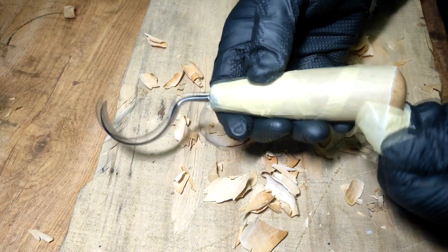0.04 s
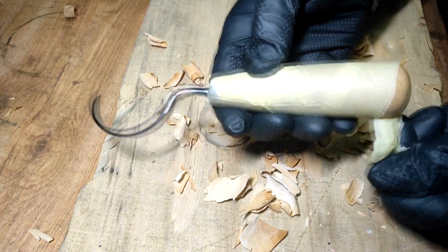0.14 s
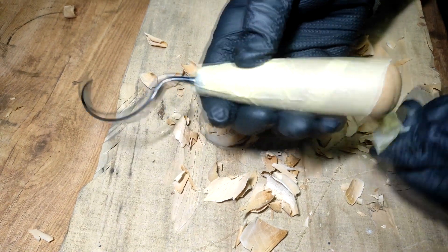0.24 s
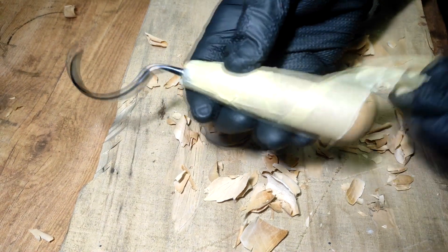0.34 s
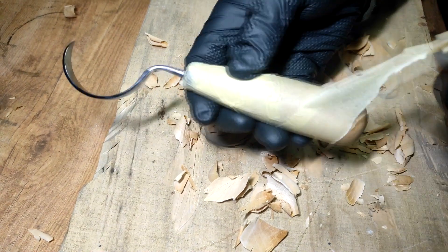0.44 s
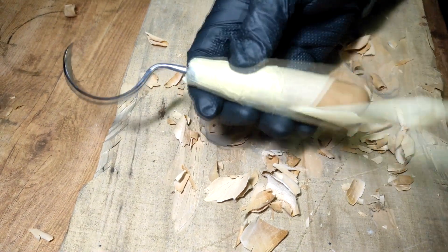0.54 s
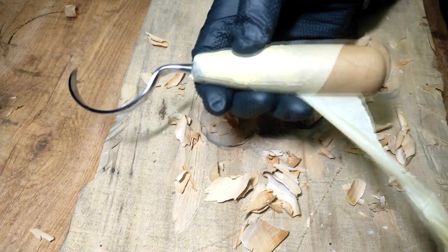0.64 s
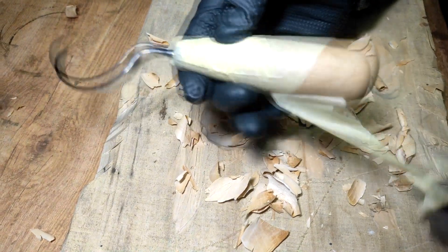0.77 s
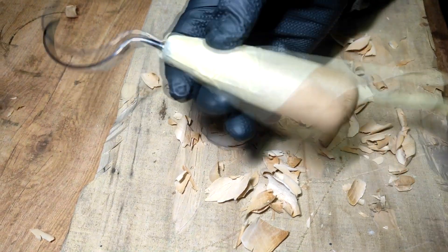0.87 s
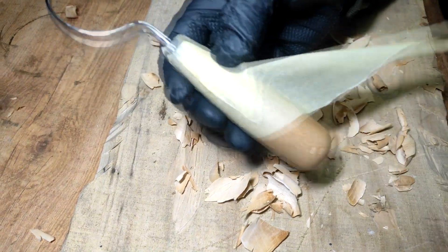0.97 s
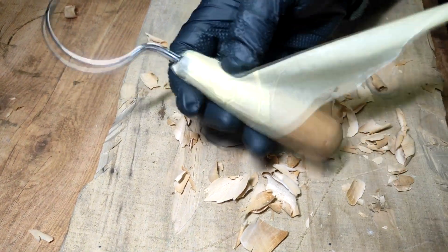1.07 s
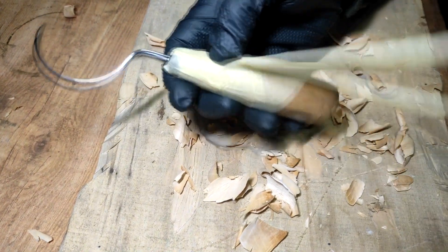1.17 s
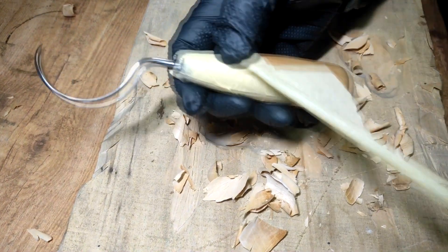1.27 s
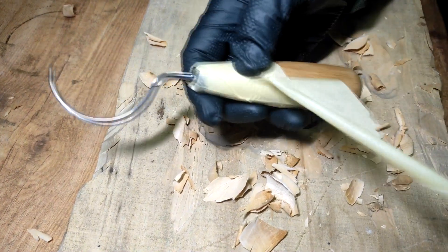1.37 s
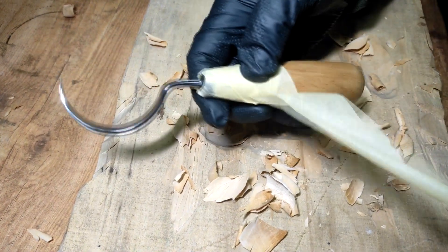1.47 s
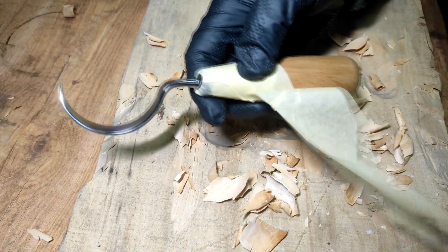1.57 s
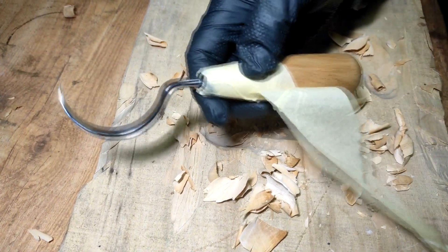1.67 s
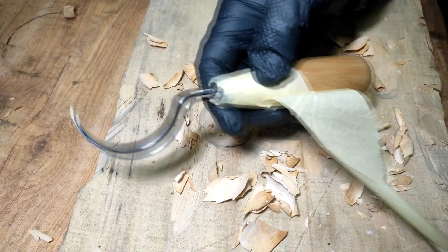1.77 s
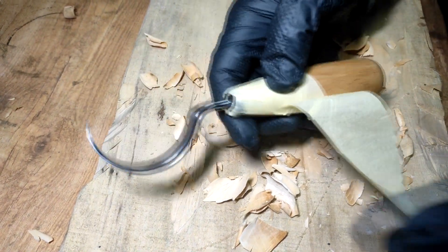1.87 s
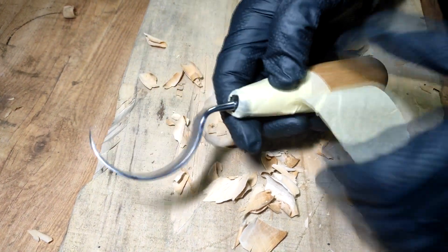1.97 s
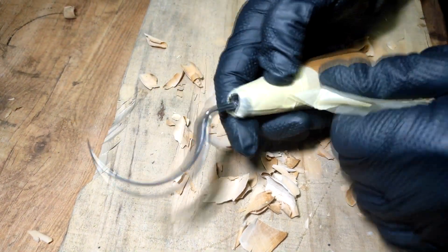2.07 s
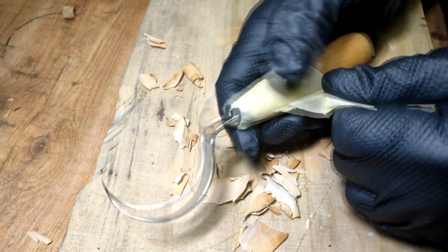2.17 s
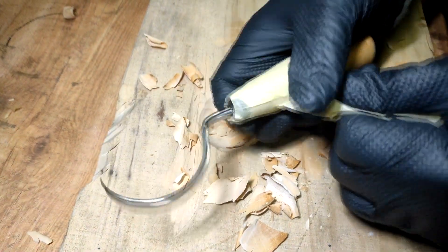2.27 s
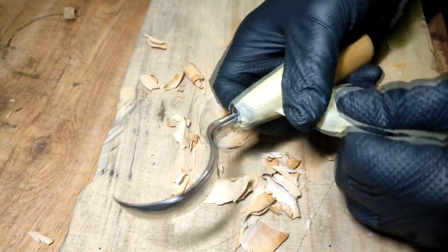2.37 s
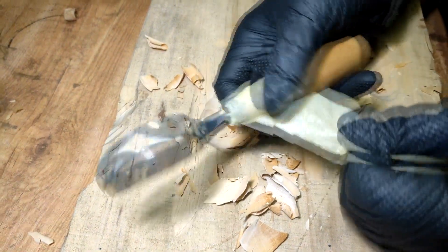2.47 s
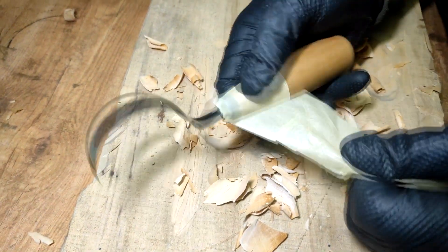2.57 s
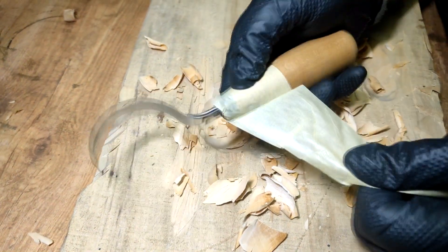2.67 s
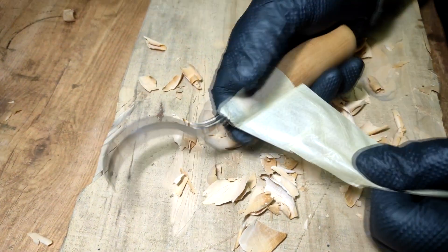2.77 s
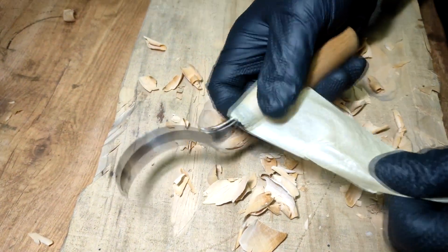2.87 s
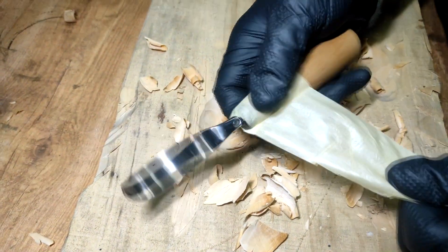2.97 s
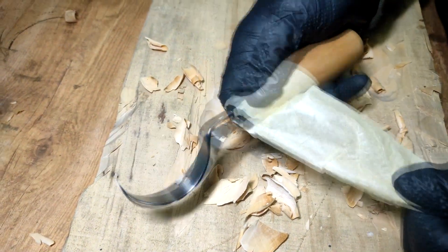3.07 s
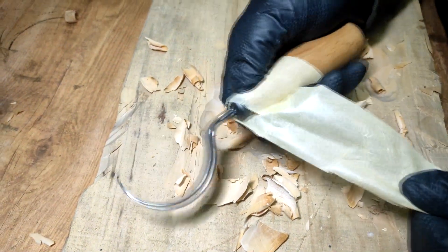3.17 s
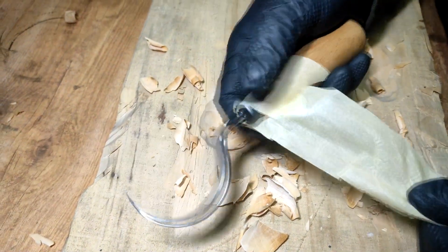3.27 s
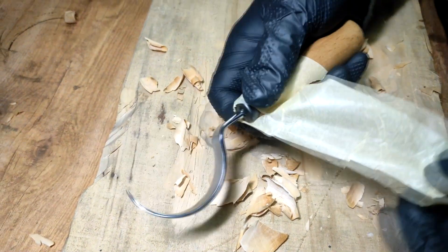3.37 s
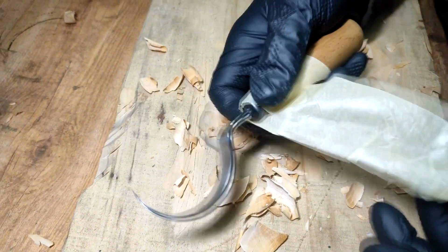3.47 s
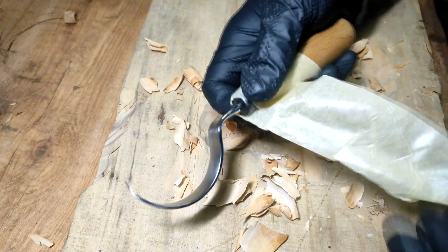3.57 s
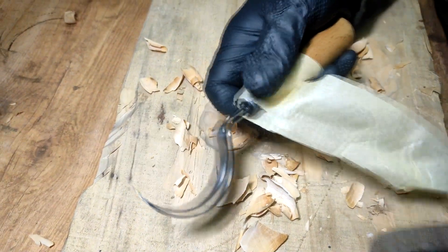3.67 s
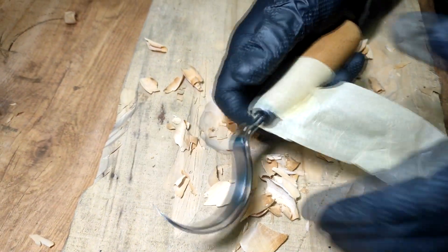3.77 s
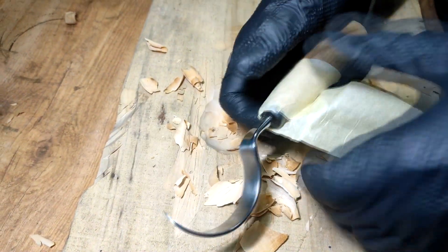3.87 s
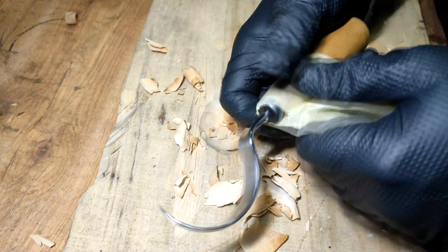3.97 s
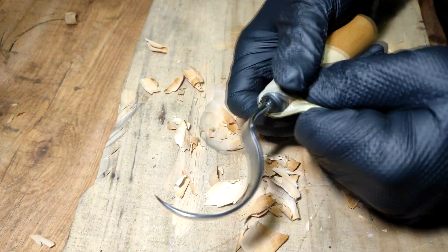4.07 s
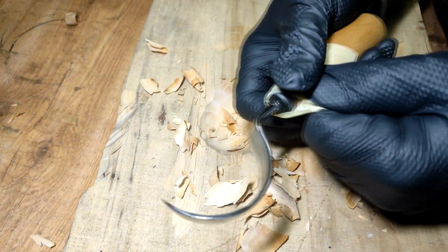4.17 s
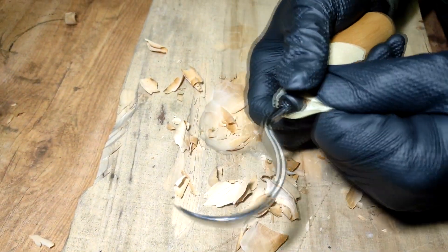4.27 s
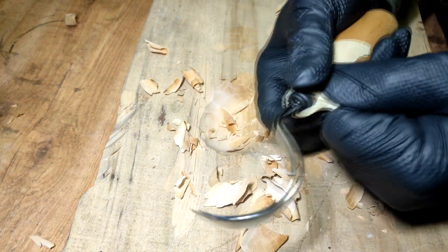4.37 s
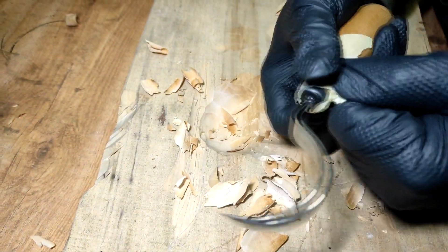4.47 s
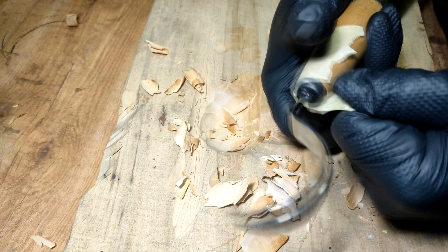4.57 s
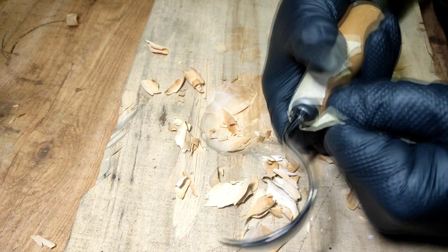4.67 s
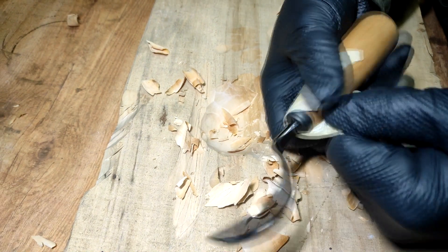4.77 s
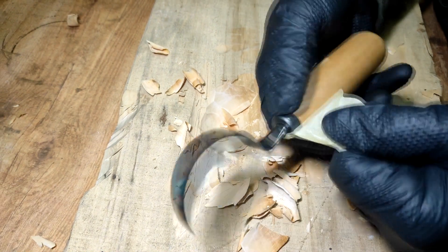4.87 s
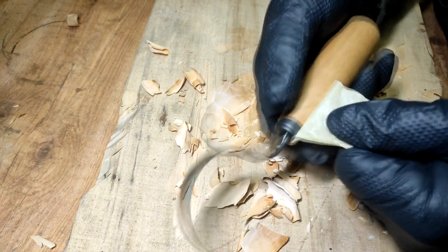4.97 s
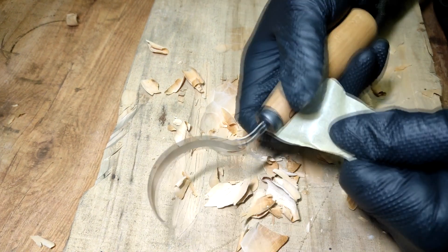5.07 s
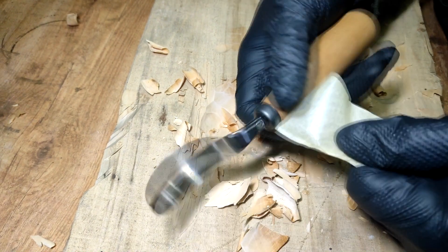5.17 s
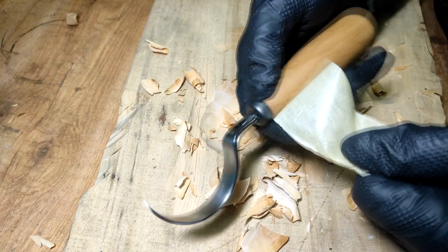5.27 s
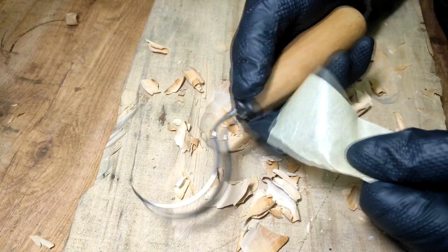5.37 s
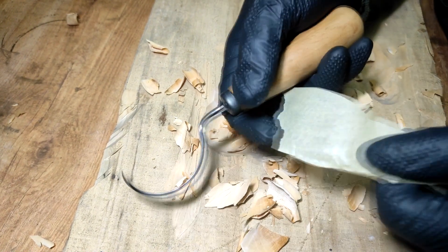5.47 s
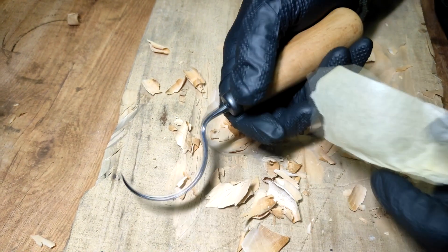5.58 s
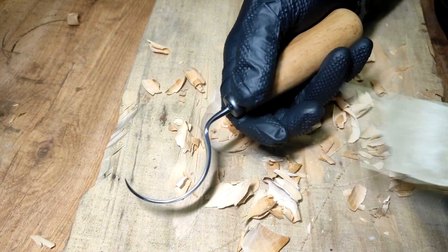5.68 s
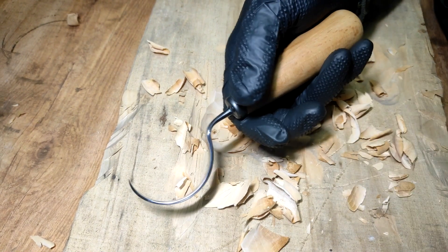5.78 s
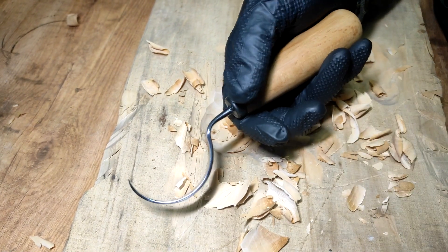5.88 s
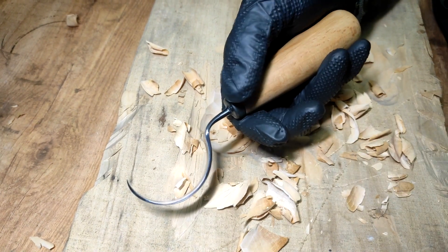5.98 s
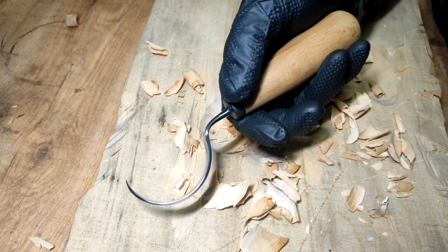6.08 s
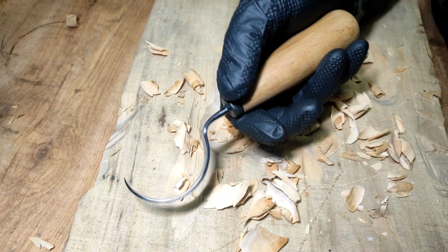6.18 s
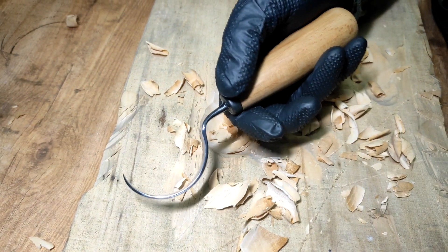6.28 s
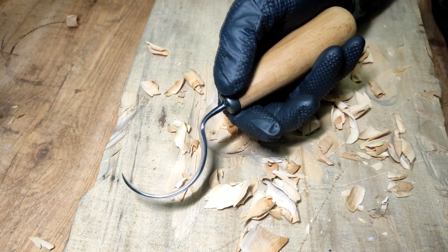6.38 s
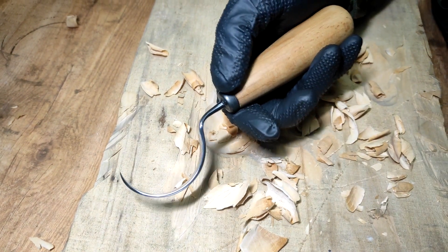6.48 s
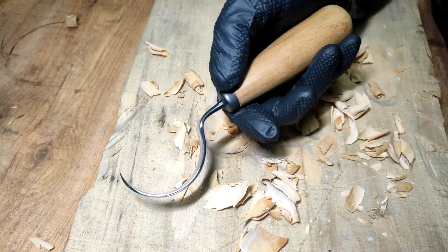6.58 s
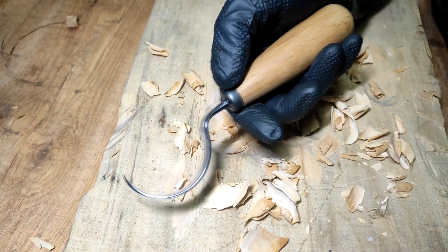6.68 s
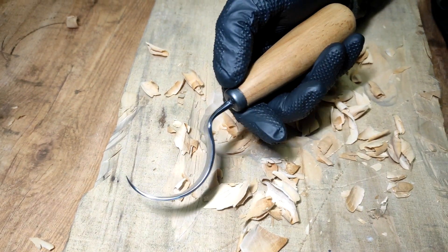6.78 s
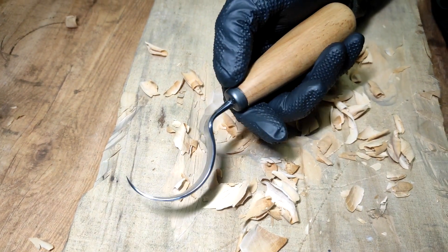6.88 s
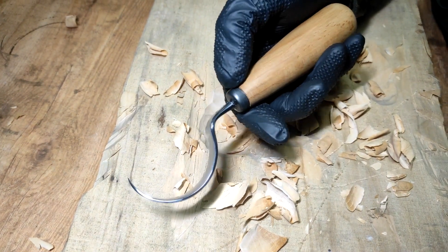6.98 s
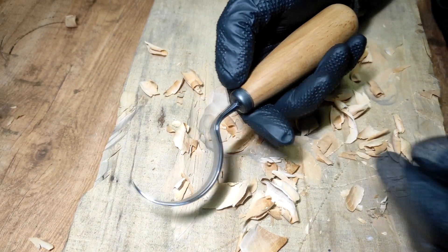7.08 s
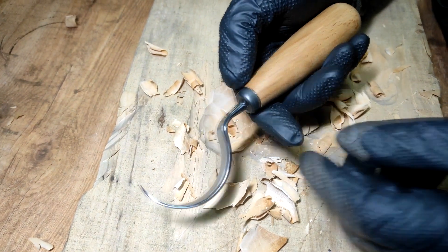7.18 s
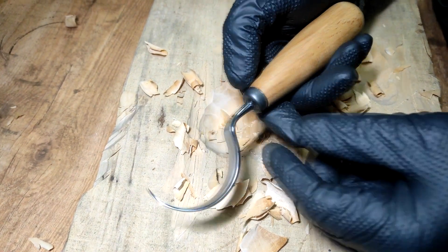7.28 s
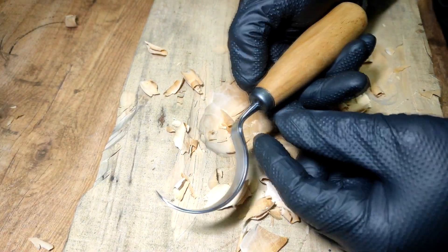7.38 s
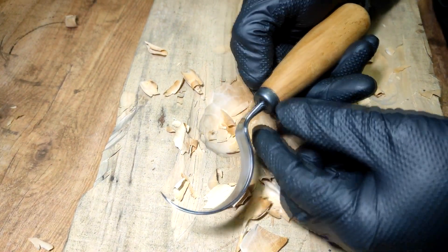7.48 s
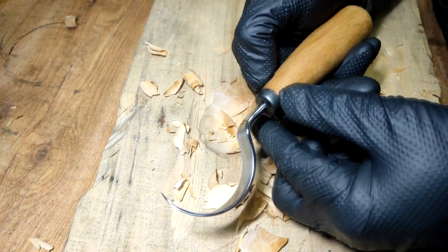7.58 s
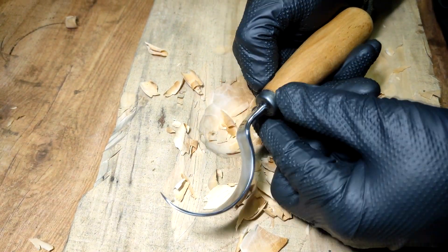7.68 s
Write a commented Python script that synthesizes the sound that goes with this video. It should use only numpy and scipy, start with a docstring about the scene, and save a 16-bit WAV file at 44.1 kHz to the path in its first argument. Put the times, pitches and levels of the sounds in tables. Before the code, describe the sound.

Close, crisp crackling and tearing as gloved hands pull adhesive wrap from a handle in uneven bursts, ending in faint rubbing.

```python
"""Peeling sticky wrap off a tool handle

Gloved hands pull wrap from a wooden handle, close to a phone above a workbench. The glue lets go by
stick-slip, in dense irregular clicks, and the creased sheet snaps in lone cracks with a short rattle.
The bench and a small quiet workshop reflect the sound; the phone's ports resonate near 7 kHz."""
import sys
import numpy as np
from scipy import signal
from scipy.fft import rfft, irfft
from scipy.io import wavfile
from scipy.ndimage import uniform_filter1d

SR = 44100
rng = np.random.default_rng(int(sys.argv[2]) if len(sys.argv) > 2 else 0)


def output_pcm(signal):
    """Save a mono or channel-first signal as 16-bit PCM at the path in sys.argv[1].

    Samples are clipped to [-1, 1] before scaling.
    """
    pcm = np.clip(np.atleast_2d(signal).T, -1, 1) * 32767
    wavfile.write(sys.argv[1], SR, np.round(pcm).astype(np.int16))


N = 341334

# Position of the hands. Each row: time in seconds, left minus right level in dB.
HANDS = [(0.0, -3), (0.19, -0.5), (2.87, -3), (3.75, 0.5), (4.18, -4), (6.1, -1), (6.81, -3.5), (7.26, 26),
         (7.52, -5.5), (7.74, -7)]
# Band edges of what a slip excites: the handle thuds, the sheet flexes, the glue ticks.
HANDLE_HZ = [300, 600, 850, 1100, 1400]
SHEET_HZ = [1400, 2100, 3100, 4500]
TICK_HZ = [4500, 6200, 8200, 11000, 17000]
LEFT_RIGHT = np.array([[1], [-1]])


def undb(db):
    """Amplitude ratio of a level in dB."""
    return 10 ** (np.asarray(db) / 20)


def unit(x):
    """Normalisation to an RMS of 1."""
    return x / np.sqrt(np.mean(x ** 2))


def butter(x, order, hz, kind):
    """Butterworth filtering, flat in the passband."""
    return signal.sosfilt(signal.butter(order, hz, kind, fs=SR, output="sos"), x)


def at(curve, t):
    """Linear interpolation of a curve at times t."""
    return np.interp(t, *np.transpose(curve))


def delayed(x, lag):
    """A moving delay of lag samples, by interpolation."""
    return np.interp(np.arange(N) - lag, np.arange(N), x)


def gain_at(spectrum, size):
    """Gain in dB at each transform bin, interpolated over log frequency."""
    hz, db = np.transpose(spectrum)
    return np.interp(np.log(np.maximum(np.fft.rfftfreq(size, 1 / SR), 1)), np.log(hz), db)


def minimum_phase(db):
    """Folding the cepstrum gives the most compact causal response with these gains."""
    cepstrum = irfft(db * np.log(10) / 20)
    cepstrum[1:len(cepstrum) // 2] *= 2
    cepstrum[len(cepstrum) // 2 + 1:] = 0
    return irfft(np.exp(rfft(cepstrum)))


def sway(rate):
    """Slow random modulation of RMS 1, ramping to a new value rate times a second."""
    hold = int(SR / rate)
    steps = np.repeat(rng.standard_normal(N // hold + 1), hold)
    return unit(uniform_filter1d(steps, hold)[:N])


def swells(events, rest_db, depth_db=17):
    """Powers add: a resting level plus events that change by depth_db over each rise and fall."""
    s, level_db, rise, fall = np.array(events).T[:, :, None]
    t = np.arange(0, N + 64, 64) / SR
    lost_db = depth_db * np.maximum((s - t) / rise, (t - s) / fall)
    power = undb(2 * rest_db) + undb(2 * (level_db - lost_db)).sum(0)
    return np.interp(np.arange(N) / SR, t, np.sqrt(power))


def workshop(air_db=-69):
    """Room noise, coherent between the ports mainly in the bass, over a deep rumble."""
    # Workshop air. Each row: frequency in Hz, relative spectral density in dB.
    air_spectrum = [(41, -23), (70, -5.5), (139, -11), (309, -15.5), (1570, -22), (5030, -19),
                    (7080, -15.5), (9110, -23), (10400, -63.5), (16500, -49)]
    # Rumble as the hands move. Each row: peak time in seconds, level in dB, rise and fall in seconds.
    rumbles = [(2.05, -62.5, 0.12, 0.18), (3.575, -68, 0.032, 0.16), (4.65, -54.5, 0.033, 0.11),
               (4.95, -66.5, 0.13, 0.11), (5.7, -67, 0.092, .1), (5.99, -67, 0.37, 0.26),
               (7.15, -69, 0.33, 0.29)]
    mid, side = rfft(rng.standard_normal((2, N))) * undb(gain_at(air_spectrum, N))
    width = np.clip(np.fft.rfftfreq(N, 1 / SR) / 700, .45, 1)
    air = irfft(mid + LEFT_RIGHT * width * side, N)
    low = butter(rng.standard_normal((2, N)), 3, [22, 68], "bandpass")
    rumble = unit(low[0]) * undb(3 * LEFT_RIGHT) + .39 * unit(low[1]) * LEFT_RIGHT
    return unit(air) * undb(air_db) + rumble * swells(rumbles, rest_db=-77.5)


def echo(t60, level_db, delay_s, top_hz):
    """Diffuse reflections decay exponentially, in a separate pattern at each port."""
    t = np.arange(int(t60 * SR)) / SR
    spray = rng.standard_normal((2, len(t))) * undb(-60 * t / t60) * (t > delay_s)
    spray = butter(spray, 1, top_hz, "lowpass")
    return spray * undb(level_db) / np.sqrt(np.sum(spray ** 2, 1, keepdims=True))


def reflections(x, patterns=6):
    """Early reflections off hands, tool and sheet, later ones off walls; patterns blend as hands move."""
    shares = undb(15 * np.array([sway(6) for _ in range(patterns)]))
    shares /= np.sqrt(np.sum(shares ** 2, 0))
    out = np.zeros((2, N))
    for share in shares:
        near = echo(t60=.007, level_db=-7, delay_s=.0006, top_hz=9200)
        walls = echo(t60=.25, level_db=-16, delay_s=.0046, top_hz=7000)
        for response in near, walls:
            out += signal.oaconvolve(x * share, response, axes=1)[:, :N]
    return out


def bench_top(x, share=.46, delay_s=.00042, drift_s=.000222):
    """Comb filtering: the image source in the bench arrives late, by a gap that drifts with the hands."""
    lags = np.abs(delay_s + drift_s * (sway(5) + .48 * sway(5) * LEFT_RIGHT)) * SR
    return x + share * np.array([delayed(channel, lag) for channel, lag in zip(x, lags)])


def grip():
    """Contact noise of rubber on wood: dull uneven bumps, louder at the left port."""
    # Shifts of grip. Each row: peak time in seconds, level in dB, rise and fall in seconds.
    shifts = [(0.3, -51.5, 0.06, 0.041), (0.445, -58, 0.025, 0.11), (0.51, -49, 0.072, 0.13),
              (0.59, -52, 0.061, 0.18), (0.95, -56.5, 0.18, 0.48), (1.55, -65, 0.044, 0.28),
              (2.15, -63, 0.21, 0.16), (2.285, -63.5, 0.011, 0.065), (2.64, -49, 0.12, 0.14),
              (3.12, -57.5, 0.33, 0.2), (3.46, -52.5, 0.034, 0.039), (3.572, -48, 0.022, 0.036),
              (4.642, -46.5, 0.011, 0.051), (5.12, -60.5, 0.038, 0.12), (5.325, -60.5, 0.013, 0.17),
              (5.65, -45, 0.035, 0.065), (5.85, -61.5, 0.017, 0.11), (6.1, -62.5, 0.25, 0.12)]
    bumps = rng.standard_normal((2, N)) * undb(3.3 * sway(40))
    dull = butter(bumps, 3, [150, 540], "bandpass")
    stereo = unit(dull[0]) * undb(2.5 * LEFT_RIGHT) + .5 * unit(dull[1]) * LEFT_RIGHT
    return stereo * swells(shifts, rest_db=-74)


def band_responses(edges_hz, size=2048):
    """Impulse responses of each band at both ports; their sum, averaged over the ports, has energy 1."""
    # The wrap heard through the ports. Each row: frequency in Hz, relative spectral density in dB.
    colour = [(240, -51), (400, -29), (650, -17.5), (1200, -14), (1870, -17.5), (3030, -15.5), (5730, -13),
              (6500, -5), (7600, -4), (8700, -11.5), (10200, -24), (15000, -26), (16500, -43)]
    # Imbalance of the ports. Each row: frequency in Hz, left minus right level in dB.
    imbalance = [(60, -8), (110, -4.5), (200, 27), (380, 14.5), (700, 4), (1290, 5), (2380, 3), (4400, 1),
                 (8120, -2), (15000, 4)]
    ports = [minimum_phase(gain_at(colour, size) + side * gain_at(imbalance, size) / 2)
             for side in (1, -1)]
    bands = np.array([butter(ports, 2, pair, "bandpass") for pair in zip(edges_hz, edges_hz[1:])])
    return bands / np.sqrt(np.sum(bands.sum(0).mean(0) ** 2))


def clicks(s, parts, scatter_db, swell_db, smear_s):
    """Impulse excitation: a click at each time s rings every band with its own strength and delay."""
    out, pan_db = np.zeros((2, N)), at(HANDS, s)
    port_gap_s = .00005 * rng.standard_normal(len(s))
    for edges_hz, size in parts:
        for response in band_responses(edges_hz):
            strength, late, sign = rng.standard_normal((len(s), 3)).T
            # the stretched sheet changes shape, so each band swells and fades on its own
            shape_db = swell_db * sway(9)[np.clip((s * SR).astype(int), 0, N - 1)]
            push = size * undb(scatter_db * strength + shape_db) * np.sign(sign)
            for channel, side in enumerate((1, -1)):
                arrival = ((s + smear_s * np.abs(late) + side * port_gap_s / 2) * SR).astype(int)
                train = np.bincount(np.clip(arrival, 0, N - 1), push * undb(side * pan_db / 2), N)
                out[channel] += signal.oaconvolve(train, response[channel])[:N]
    return out


def pops(s, size, hz, t60):
    """Damped resonance: a pocket of sheet rings briefly at its own pitch."""
    t = np.arange(1024) / SR
    ring = (1 - np.exp(-t / .000088)) * undb(-60 * t / t60) * np.sin(2 * np.pi * hz[:, None] * t)
    where = np.clip((s * SR).astype(int)[:, None] + np.arange(len(t)), 0, N - 1).ravel()
    pan_db = .21 * at(HANDS, s)
    gains = size * undb(LEFT_RIGHT * pan_db / 2)
    return np.array([np.bincount(where, (gain[:, None] * ring).ravel(), N) for gain in gains])


def flaps():
    """A low damped resonance sounds as the strip lets go of the handle."""
    # Dull flaps. Each row: start in seconds, level in dB, pitch in Hz.
    releases = [(3.4569, -45, 499.4), (3.5678, -26.5, 720)]
    s, level_db, hz = np.transpose(releases)
    return butter(pops(s, undb(level_db), hz, t60=.0094), 1, 250, "highpass")


def cracks(snaps=12, rattle_t60=.04):
    """Snap-through buckling: a crease snaps once, and smaller snaps die out along the fold."""
    # Creases. Each row: start in seconds, treble and hollow pop levels in dB, mean pop pitch in Hz.
    creases = [(0.022, -14, -43, 4250), (0.2374, -19, -39, 2500), (0.314, -14, -26.5, 2387),
               (0.3236, -14, -23, 2335), (0.3315, -14.5, -21.5, 2223), (0.3416, -13, -30, 1100),
               (0.361, -23.5, -33, 1800), (0.502, -11.5, -26.5, 2100), (0.5108, -12.5, -27, 1950),
               (0.527, -15, -28, 1700), (0.553, -20.5, -29.5, 2196), (0.568, -18, -46, 2690),
               (0.5842, -15, -30, 930), (0.6078, -12, -25.5, 3900), (0.624, -14.5, -37, 2970),
               (0.637, -25, -32, 3520), (0.649, -21, -41, 3030), (0.6605, -12, -29, 3120),
               (0.7673, -19.5, -39, 1830), (1.0695, -8, -20.5, 2340), (1.129, -18.5, -31.5, 1918),
               (1.149, -34, -37, 4190), (1.1737, -16.5, -32, 1960), (1.1892, -25, -26.5, 2700),
               (1.2087, -20, -35.5, 2292), (1.2647, -32, -37, 3150), (1.3164, -26.5, -32.5, 4270),
               (1.353, -30, -36.5, 3940), (1.3961, -24.5, -32.5, 2900), (1.424, -23, -34, 3366),
               (1.527, -27, -38, 3540), (2.184, -19.5, -32.5, 3000), (2.2706, -13.5, -31, 3525),
               (2.2793, -7.5, -26, 3468), (2.3977, -21, -30, 1300), (2.418, -24, -31, 1223),
               (2.7433, -7.5, -32, 1890), (2.756, -14, -35.5, 2993), (2.7886, -17, -27.5, 2545),
               (2.795, -15.5, -26, 3000), (2.8088, -23, -31, 4110), (2.84, -12, -23, 2000),
               (2.8796, -36, -28.5, 1607), (2.92, -20.5, -32, 2483), (2.9505, -18, -27.5, 4097),
               (2.983, -18, -26, 3480), (3.0106, -14, -26.5, 1816), (3.0252, -19, -40, 3504),
               (3.043, -16, -32, 1996), (3.1115, -15, -28.5, 1182), (3.1809, -13, -20, 3743),
               (3.2344, -19, -32, 4290), (3.4453, -25.5, -42, 1747), (3.5657, -16, -23, 960),
               (4.076, -26.5, -30, 1545), (4.1162, -36, -37, 3480), (4.2848, -15, -38, 3340),
               (4.3678, -46, -34.5, 2334), (4.4192, -35.5, -61.5, 3540), (4.461, -39, -38, 1985),
               (4.5526, -40, -34.5, 2120), (4.5976, -35, -54, 1499), (4.6352, -9.5, -20, 3430),
               (4.6431, -18, -16, 1147), (4.734, -30.5, -22.5, 3130), (4.763, -30, -31.5, 3035),
               (4.985, -12.5, -25, 4368), (5.097, -27, -40, 3395), (5.1072, -20.5, -34, 3172),
               (5.183, -24.5, -34, 4277), (5.213, -20, -35, 3802), (5.242, -22.5, -43.5, 1137),
               (5.2696, -17, -27.5, 3055), (5.3168, -12, -18.5, 3020), (5.3262, -14.5, -23.5, 1764),
               (5.418, -30, -45, 1507), (5.608, -18, -29.5, 2500), (5.6234, -17.5, -27, 1820),
               (5.654, -26, -24.5, 1183), (5.845, -44, -41, 1060), (5.8753, -38.5, -46, 2590),
               (5.909, -36, -40.5, 2720), (5.9484, -32.5, -44.5, 4320), (7.6151, -34, -50, 4010),
               (7.633, -31, -40.5, 3000)]
    start, tick_db, pop_db, hz = np.array(creases).T[:, :, None]
    when, detune = np.moveaxis(rng.random((len(start), snaps, 2)), 2, 0)
    after_s = rattle_t60 * when ** 2 / 2
    after_s[:, 0] = 0
    size = undb(-6 - 60 * after_s / rattle_t60) * slip_sizes(after_s.shape, spread_db=2.1)
    size[:, 0] = 1
    s = (start + after_s).ravel()
    response_peak = np.abs(band_responses(TICK_HZ).sum(0).mean(0)).max()
    tick = (size * undb(tick_db - 6)).ravel() / response_peak
    pop = (size * undb(pop_db)).ravel()
    parts = (HANDLE_HZ, pop * undb(-8)), (SHEET_HZ, pop * undb(3.5)), (TICK_HZ, tick)
    rattle = clicks(s, parts, scatter_db=.4, swell_db=-2, smear_s=.0004)
    hollow = pops(s, pop, (hz * (1 + .6 * (detune - .5))).ravel(), t60=.0077)
    return rattle + butter(hollow, 2, 700, "highpass")  # the small pocket radiates no bass


def loose_strip(x, returned=.36, wobble=.06, trips=3):
    """Waves run to and fro along the loose strip, so its resonances slide with the tension."""
    # Tuning of the strip. Each row: time in seconds, lowest resonance in Hz.
    tuning = [(0.0, 4200), (0.07, 1610), (0.16, 1000), (0.33, 1200), (0.45, 2430), (0.74, 1971),
              (1.05, 2404), (1.53, 3350), (2.2, 3300), (2.5, 1981), (2.75, 1121), (3.0, 2242), (4.31, 2600),
              (4.67, 1483), (5.12, 3603), (5.8, 2019)]
    lag = SR / (at(tuning, np.arange(N) / SR) * np.exp(wobble * sway(14)))
    back = sum(returned ** k * np.array([delayed(channel, k * lag) for channel in x])
               for k in range(1, trips + 1))
    return x + butter(back, 2, 5000, "lowpass")


def pulling(s, rise_db=15, fall_db=32.5):
    """Pulls and rubbing add in power, giving treble, sheet and handle levels in dB at times s."""
    # Pulls on the wrap. Each row: start, rise, hold and fall in seconds, treble level in dB,
    # sheet and handle levels in dB relative to the treble.
    pulls = [(0.0, 0.00086, 0.044, 0.84, -36.5, -3.5, -36), (0.051, .01, .11, 0.11, -45, 7.5, -3.5),
             (0.179, 0.029, 0.11, 0.14, -33, -3, -11.5), (0.283, 0.027, 0.032, 0.19, -29, -9, -22),
             (0.372, 0.026, 0.13, 0.086, -33, -8.5, -11), (0.535, 0.023, .11, .05, -36.5, -9, -16),
             (0.653, 0.003, 0.04, 0.094, -31, -11.5, -13.5), (0.84, 0.0041, 0.2, 0.054, -30.5, -10, -18),
             (1.069, 0.018, 0.13, 0.074, -42, -9.5, -31), (1.247, .004, 0.16, 0.14, -47.5, -5.5, -20),
             (1.514, 0.0039, 0.015, 0.031, -41, -10, -14), (1.529, 0.026, 0.022, 0.063, -31, -5.5, -18.5),
             (2.084, 0.11, 0.018, 0.1, -40.5, -1.5, -9), (2.233, 0.0099, 0.011, 0.027, -39, -3, -27),
             (2.27, 0.006, 0.042, 0.07, -30, -2.5, -15), (2.409, 0.01, 0.046, 0.055, -35.5, -7.5, -10),
             (2.489, 0.066, .16, 0.097, -26, -6.5, -10), (2.8, 0.066, 0.0019, 0.023, -43, 1, -18),
             (2.873, 0.003, 0.023, 0.018, -36.5, -7.5, -19),
             (2.914, 0.0038, 0.023, 0.12, -36.5, -6.5, -13.5), (3.006, 0.0066, 0.065, 0.27, -29, -4, -17),
             (3.17, 0.0022, 0.02, 0.021, -22, -5, -12), (3.195, .003, .002, 0.065, -44, 1, -5),
             (3.422, 0.021, 0.0086, 0.037, -35, -3.5, -13.5),
             (3.507, 0.0048, 0.055, 0.027, -33.5, -11.5, -14.5),
             (3.674, 0.0086, 0.02, 0.032, -52.5, -7.5, -9.5),
             (3.755, 0.0044, 0.0074, 0.056, -52, -15.5, -32), (3.806, .008, 0.012, 0.043, -51, -20, -6.5),
             (4.023, 0.0032, 0.012, 0.13, -56.5, 12, 7), (4.099, 0.0057, 0.019, 0.17, -52, 5, -2.5),
             (4.28, 0.0048, .002, 0.29, -50.5, -6.5, -8.5), (4.63, 0.0043, 0.011, 0.048, -26, -3.5, -9.5),
             (4.768, 0.0064, 0.0021, 0.064, -42, -1.5, -12.5),
             (4.933, 0.0024, .002, 0.16, -35.5, -3.5, -13), (5.1, 0.02, 0.011, 0.079, -29.5, -4.5, -12),
             (5.177, 0.024, .005, 0.067, -36, -9, -16), (5.261, 0.015, 0.0018, 0.029, -36.5, 2, -30),
             (5.308, 0.0047, 0.033, 0.41, -44, -7, -17), (5.586, 0.04, 0.042, 0.11, -34.5, -4, -9.5),
             (5.715, 0.02, 0.0063, 0.023, -44, -4, -6), (5.97, 0.0056, 0.13, 0.21, -48, -6, -16),
             (6.613, 0.012, 0.0057, 0.21, -42.5, -5.5, -10),
             (7.626, 0.0032, 0.0091, 0.046, -42.5, -6.5, -16.5)]
    # Gloves rubbing on wrap and wood. Each row: time in seconds, treble level in dB.
    rubbing = [(0.0, -46), (0.83, -57), (1.5, -74.5), (1.65, -57), (2.07, -60.5), (3.34, -58), (3.61, -54),
               (3.75, -68.5), (3.86, -61), (4.02, -66.5), (4.35, -64), (4.57, -54.5), (4.93, -51),
               (5.09, -58), (5.46, -60), (5.95, -55.5), (6.3, -82), (6.5, -64.5), (6.6, -72), (6.8, -67.5),
               (7.05, -83.5), (7.58, -64.5), (7.74, -56.5)]
    start, rise, hold, fall, level_db, sheet_db, handle_db = np.array(pulls).T[:, :, None]
    lost_db = rise_db * np.clip(1 - (s - start) / np.maximum(rise, .001), 0, 1)
    lost_db += fall_db * np.maximum(s - start - np.maximum(rise, .001) - hold, 0) / np.maximum(fall, .005)
    pull = undb(2 * (level_db - lost_db)) * (s >= start)
    rub = undb(2 * at(rubbing, s))
    return [10 * np.log10((pull * undb(2 * pull_db)).sum(0) + rub * undb(2 * rub_db))
            for pull_db, rub_db in ((0, 0), (sheet_db, -3.5), (handle_db, -8.5))]


def slip_sizes(count, spread_db):
    """A capped power law of amplitudes: many small slips, a few large."""
    size_db = spread_db * np.minimum(rng.exponential(size=count), 5)
    return undb(size_db - 1.83 * spread_db)


def peel(slips_per_s=3000, jumps_per_s=150, jump_db=13):
    """Stick-slip: glue strands let go at random; a harder pull makes the peel front jump more often."""
    rub_db, rip_db = -69, -38.5  # below the first gloves rub smoothly, above the second the glue rips
    count = int(slips_per_s * N / SR)
    s = np.sort(rng.uniform(0, N / SR, count))
    level_db, sheet_db, handle_db = pulling(s)
    effort = np.clip((level_db - rub_db) / (rip_db - rub_db), .45, 1)
    jump_rate = jumps_per_s * undb(2.5 * sway(60)[(s * SR).astype(int)] + .6 * (level_db - rip_db))
    cycles = np.cumsum(jump_rate / slips_per_s)
    jumps = np.diff(np.floor(cycles), prepend=0) > 0  # one snap each stick-slip cycle
    surge_db = 1.2 * unit(uniform_filter1d(rng.standard_normal(count), size=40))
    uneven_db = effort * (jump_db * jumps - 3.5 * np.sin(2 * np.pi * cycles) + surge_db)
    size = undb(uneven_db - 9.5) * slip_sizes(count, spread_db=effort) * np.sqrt(N / count)
    parts = ((HANDLE_HZ, size * undb(handle_db)), (SHEET_HZ, size * undb(sheet_db)),
             (TICK_HZ, size * undb(level_db)))
    return clicks(s, parts, scatter_db=1.5, swell_db=2, smear_s=.0003)


def scene():
    """Superposition of the wrap, its reflections, the gloves and the room."""
    wrap = bench_top(loose_strip(peel()) + cracks() + flaps())
    return wrap + reflections(wrap) + grip() + workshop()


def record(dry):
    """Soft saturation in the phone rounds the hardest peaks; a steep low-pass cuts the very top."""
    low_pass = signal.ellip(10, .2, 90, 15900, fs=SR, output="sos")
    return signal.sosfilt(low_pass, np.tanh(1.64 * dry) / 1.69)


dry = scene()
out = record(dry)
output_pcm(out)
```